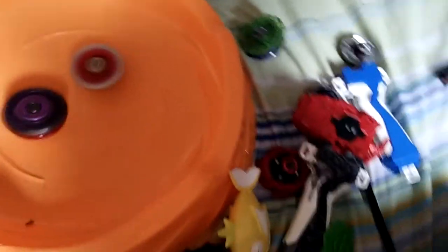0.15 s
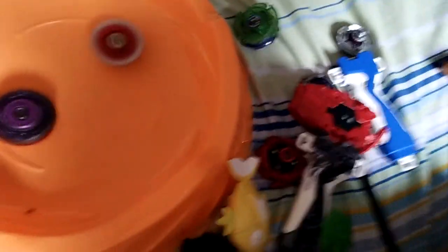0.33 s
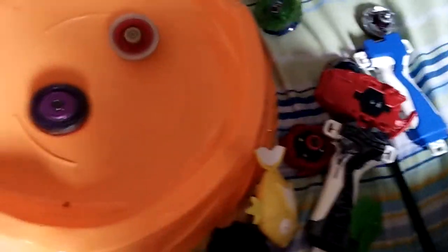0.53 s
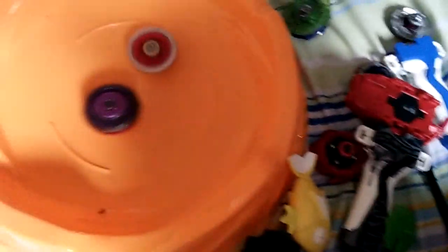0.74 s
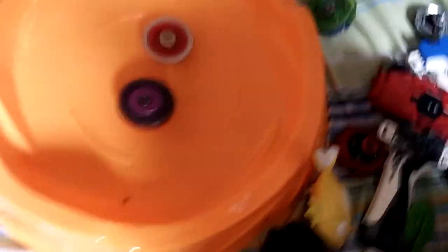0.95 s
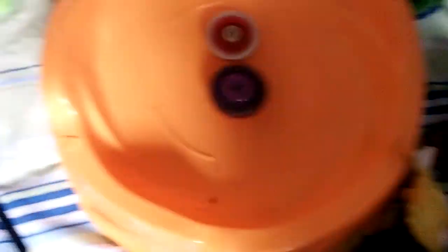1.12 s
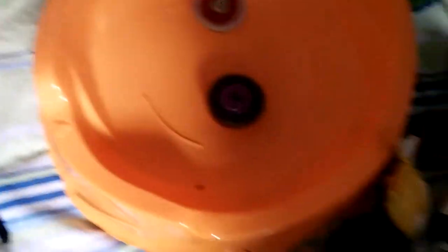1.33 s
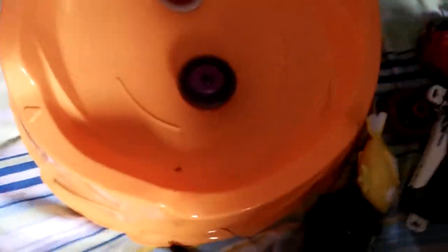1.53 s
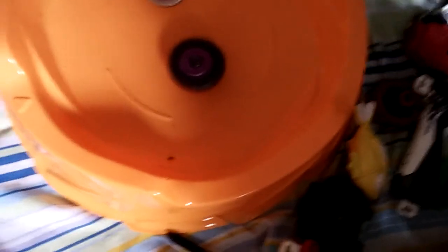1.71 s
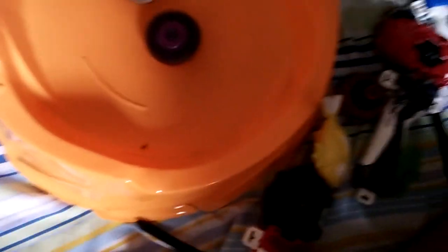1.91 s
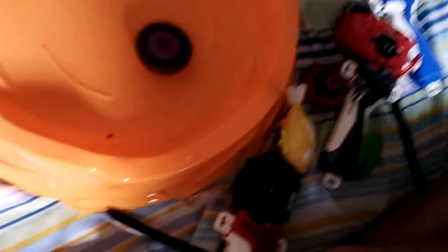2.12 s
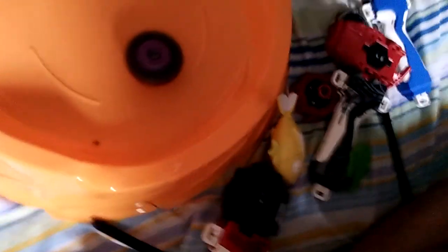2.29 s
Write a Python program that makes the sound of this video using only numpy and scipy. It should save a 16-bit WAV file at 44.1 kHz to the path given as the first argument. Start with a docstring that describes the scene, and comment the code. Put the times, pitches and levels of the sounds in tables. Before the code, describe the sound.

Two plastic toy tops collide four times in a hollow bowl, clacking sharply over faint rolling

```python
"""Toy tops clashing in a bowl

Two toy tops spin in a thin plastic bowl in a small room. Four times they clash: shaped noise makes the crack,
the plastic body and the bright room tail, and fading sine waves make the bowl's thump and the metal discs' ring.
In between, short noise bursts are the rims grazing, and roughened bowl tones are the wobbling tips knocking.
Under it all lies a soft rolling rumble: noise that pulses about once a turn."""
import sys
import numpy as np
from scipy import signal
from scipy.fft import rfft, irfft
from scipy.io import wavfile
from scipy.ndimage import uniform_filter1d

SR = 44100
rng = np.random.default_rng(int(sys.argv[2]) if len(sys.argv) > 2 else 0)


def digitize_waveform(pressure):
    """Quantize a signal to 16-bit integers and store it at the path in sys.argv[1].

    Rows of a 2-D input are taken as channels; values are limited to [-1, 1].
    """
    field = np.atleast_2d(pressure).T
    bounded = np.clip(field, -1, 1)
    quanta = np.round(bounded * 32767).astype(np.int16)
    wavfile.write(sys.argv[1], SR, quanta)


N = 103635
T = np.arange(N) / SR  # time of each sample in seconds

# In the spectra only the shape counts, because noise() evens out the overall level.
# Level of the rolling tips. Each row: time in seconds, level in dB.
ROLL_LEVEL = [(0, -55.5), (.08, -66), (0.137, -52.5), (0.219, -49), (0.508, -68), (.62, -59), (.76, -66),
              (.87, -54.5), (1.123, -76.5), (1.36, -60), (1.451, -72), (1.949, -71), (2.149, -56),
              (2.35, -68.5)]
# Spectrum of the rolling rumble. Each row: frequency in Hz, level in dB per Hz.
ROLL_SPECTRUM = [(30, -11), (45, 4.5), (64, 15), (90, -1), (220, 3.5), (350, -8), (450, 4), (530, -9.5),
                 (620, 2.5), (850, 0), (1420, 2), (1800, -20), (2800, -26), (7000, -33)]
# Spectrum of the faint hiss. Each row: frequency in Hz, level in dB per Hz.
HISS_SPECTRUM = [(1500, 0.5), (4000, -13.5), (14000, -15)]
HISS_DB = -80.5
TURNS_PER_S, SCRAPE_SHARE = 38, 0.55  # the share is the part of the power that pulses
TICK_SCATTER_DB = 3  # how unevenly loud the small contacts are

# Light grazes of the rims. Each row: start in seconds, middle level in dB, treble level in dB.
GRAZES = [(0.0, -61.5, -58.5), (0.166, -74, -54), (0.4732, -60, -52.5), (0.5512, -63, -58.5),
          (0.606, -56, -45.5), (0.6182, -48, -79), (0.6388, -50, -59), (0.667, -56.5, -58.5),
          (0.7283, -54.5, -58.5), (0.759, -50, -64), (0.817, -54.5, -51.5), (2.2056, -70, -52.5),
          (2.2845, -86, -67)]
# Single teeth catching around a clash. Each row: start in seconds, level in dB.
RATTLES = [(0.233, -22), (0.265, -25), (0.279, -23.5), (0.295, -27), (0.321, -28.5), (0.378, -43.5),
           (0.8416, -19), (0.8483, -31), (0.9, -51), (1.158, -29.5), (1.196, -34), (2, -12.5), (2.039, -41),
           (2.094, -58)]
# Spectrum of a graze's middle range. Each row: frequency in Hz, level in dB per Hz.
GRAZE_SPECTRUM = [(1500, -26), (2500, 12), (3300, 7.5), (4500, -8), (7000, -21)]
RATTLE_FALL_S, GRAZE_FALL_S = 0.003, 0.0045
GRAZE_MIDDLE_ROOM_DB, GRAZE_TREBLE_ROOM_DB = -9.5, -3.5

# The clashes. Each row: start in seconds, crack level in dB, burst length in seconds,
# treble centre in Hz (the crack dips here, and the small parts ring most often near it),
# body level in dB, body resonance in Hz, room level in dB, room body level in dB, thump level in dB,
# boom level in dB, high ring level in dB, low ring level in dB.
CLASHES = [(0.2177, -9, .0036, 8850, -22, 850, -22.5, -32.5, -26, -25, -24.5, -54),
           (0.8436, -12, .0014, 8700, -26, 2230, -33, -42, -31, -45, -56, -57),
           (1.1522, -21, .0038, 8400, -26, 620, -31, -38, -31, -43, -62, -42),
           (1.9878, -10, .0026, 8050, -25, 1910, -25, -33, -36, -35, -54, -56)]
# Modes (natural tones) of the bowl's floor, for the thump.
# Each row: frequency in Hz before a small random shift, level in dB, time to fade by 60 dB in seconds.
THUMP_MODES = [(220.3, 2, 0.051), (267.6, -1, 0.069), (409.8, -9.5, 0.12), (583.7, -2, .07)]
# Deeper modes of the floor. Each row: frequency in Hz, level in dB, time to fade by 60 dB in seconds.
BOOM_MODES = [(45, -4, .07), (64, -2, .1), (80, 0, .06), (125, -1, .06)]
THUMP_LEAD_S, THUMP_RISE_S = 0.0079, 0.0063
# Spectrum of the hard tooth contacts. Each row: frequency in Hz, level in dB per Hz.
CRACK_SPECTRUM = [(2500, -18.5), (4000, -19.5), (5700, -12), (7000, -11.5), (8200, 0.5), (9500, -4.5),
                  (11500, -16.5), (13200, -6.5), (14500, -35.5)]
# Spectrum of the plastic body. Each row: frequency in Hz, level in dB per Hz.
BODY_SPECTRUM = [(120, -7.5), (250, -10.5), (370, -20), (520, -14.5), (850, 16), (1400, 14), (2100, 8),
                 (3100, -4), (4500, -13.5), (7000, -34)]
# Spectrum of the bright room tail. Each row: frequency in Hz, level in dB per Hz.
TAIL_SPECTRUM = [(2500, -38.5), (3200, -34.5), (4500, -11), (6000, -1.5), (7000, -2.5), (8300, 7),
                 (9600, 3.5), (11500, -8.5), (13200, -1), (14500, -8.5)]
# Spectrum of the room's answer to the body. Each row: frequency in Hz, level in dB per Hz.
TAIL_BODY_SPECTRUM = [(45, -14), (64, 1), (90, -14), (240, -5), (360, -20.5), (450, -3), (530, -12),
                      (800, -6), (1400, -5), (1900, -13.5), (2900, -9), (4500, -16), (7000, -35)]
CRACK_FALL_S, BODY_FALL_S = 0.0011, 0.005
CRACK_DIP_DB, CRACK_DIP_WIDTH_HZ = -5.5, 180
BODY_RESONANCE_DB, BODY_WIDTH_HZ = 11, 75
ROOM_T60_S, ROOM_BODY_T60_S, ROOM_RISE_S = 0.32, 0.41, 0.0049  # t60: time to fade by 60 dB
CHATTER_PER_S, CHATTER_FALL_S, CHATTER_SHARE = 130, 0.003, 0.35
PARTS_LOW_HZ, PARTS_DB = 5500, -5  # level next to the room level

# High modes of the metal discs. Each row: frequency in Hz, level in dB, time to fade by 60 dB in seconds.
HIGH_RING_MODES = [(8188, -14, .2), (8850, -13, .2), (9523, -3, .33), (9615, 0, .33), (11350, -9, .18),
                   (13020, -8, .19)]
# Lowest mode of each top's disc.
# Each row: frequency in Hz, level in dB, time to fade by 60 dB in seconds, turns per second.
LOW_RING_MODES = [(2985, 0, .8, 39), (3332, 0, 1.0, 37.7)]
LATE_FADE_S, LATE_FADE_SHARE = 0.28, 0.85  # when the ring's level sinks, and what share of it goes
RING_FLUTTER, FLUTTER_S, SPIN_SWING_RAD = 0.3, 0.004, 2.1

# Knocks of a wobbling tip on the bowl.
# Each row: start in seconds, low mode level in dB, middle modes level in dB, high modes level in dB.
KNOCKS = [(0.32, -40, -33.5, -46), (0.375, -47.5, -43.5, -52), (0.47, -49.5, -48, -72),
          (0.544, -45.5, -54, -64.5), (0.603, -51.5, -51.5, -63), (0.617, -44.5, -47, -73),
          (0.644, -52, -50.5, -74), (0.693, -47.5, -55, -68), (0.815, -38, -46.5, -55),
          (0.876, -32, -42, -45.5), (1.007, -48, -59.5, -54.5), (1.037, -42, -60, -73),
          (1.061, -47, -65, -81), (1.087, -40.5, -55, -65), (1.113, -46, -75, -67),
          (1.306, -65.5, -48.5, -57), (1.357, -54.5, -50, -51), (1.407, -67, -54.5, -61),
          (1.487, -68, -52, -64), (1.539, -65, -57, -69), (1.589, -66.5, -58.5, -77),
          (1.671, -77, -56, -81), (1.804, -83, -53.5, -68), (1.83, -59, -54.5, -74),
          (1.855, -71, -56, -70.5), (1.883, -66, -55, -67.5), (1.908, -61, -54.5, -67.5),
          (1.961, -45.5, -55, -66), (2.039, -35.5, -29, -39), (2.057, -29.5, -34.5, -37),
          (2.091, -37.5, -33, -42.5), (2.12, -53.5, -45, -60), (2.143, -60, -45, -60.5),
          (2.203, -46, -46, -67.5), (2.256, -47.5, -65, -76), (2.284, -40, -49.5, -76.5)]
# Low, middle and high modes of the bowl.
# Each row: frequency in Hz before a small random shift, level in dB, time to fade by 60 dB in seconds.
BOWL_LOW = [(780, -14.5, 0.0074), (849, -7.5, 0.046), (930, -17, 0.071)]
BOWL_MIDDLE = [(1018, 12.5, 0.016), (1185, 5, 0.047), (1282, 4, 0.079), (1436, 14.5, 0.039),
               (1465, -11, 0.11)]
BOWL_HIGH = [(2220, -8, 0.02), (2672, 1, 0.041)]
CONTACT_S, LOW_SWELL = 0.008, 1.6  # length of a push, gain of the low modes
SCUFF_DB, SCUFF_FALL_S, KNOCK_ROOM_DB = -14, 0.008, -12

WIDTH_DB = -14.5
TOP_HZ = 14350


def undb(db):
    """Turn decibels into a gain."""
    return 10 ** (np.asarray(db) / 20)


def noise(points, centre_hz=1000, change_db=0, width_hz=CRACK_DIP_WIDTH_HZ):
    """Unit-level noise with a given spectrum and an optional peak or dip."""
    f = np.arange(N // 2 + 1) * SR / N + 1e-3
    p = np.array(points)
    db = np.interp(np.log(f), np.log(p[:, 0]), p[:, 1])
    db += change_db / (1 + ((f - centre_hz) / width_hz) ** 2)
    # fade out below the first point and above the last
    ends = np.minimum(f / p[0, 0], 1) ** 2 * np.minimum(p[-1, 0] / f, 1) ** 2
    y = irfft(rfft(rng.standard_normal(N)) * undb(db) * ends, N)
    return y / y.std()


def burst(start, fall, hold=0, rise=0.0002):
    """Loudness curve that rises quickly, then falls exponentially once the hold time has passed."""
    u = T - start
    return np.clip(u / rise, 0, 1) * np.exp(-np.maximum(u - hold, 0) / fall)


def ring(modes, start, scatter=0):
    """Fading sine waves struck at one moment, scaled to a unit starting level together."""
    u, out = np.maximum(T - start, 0), np.zeros(N)
    on = (u > 0) & (u < max(m[2] for m in modes) * 2)
    for hz, db, t60 in modes:
        shifted_hz = hz * (1 + scatter * rng.standard_normal())
        cycles = shifted_hz * u[on] + rng.random()
        out[on] += undb(db) * np.sin(2 * np.pi * cycles) * np.exp(-np.log(1000) * u[on] / t60)
    return out / np.sqrt(sum(undb(m[1]) ** 2 for m in modes) / 2)


def room(x, db):
    """A sound plus its echoes, blurred together by a fading stretch of noise."""
    tail = rng.standard_normal(N) * burst(0.011, ROOM_T60_S / np.log(1000))
    return x + undb(db) * signal.fftconvolve(x, tail / np.linalg.norm(tail))[:N]


def ticks(rate, jitter, fall, share):
    """Loudness curve of unit power: a smooth part plus a train of small contacts of uneven size."""
    chance = rng.standard_normal((int(2 * rate * N / SR), 2))
    times = np.append(0, np.cumsum(np.exp(jitter * chance[:, 0]) / rate))
    last = np.searchsorted(times, T, side="right") - 1  # latest contact at each moment
    size = undb(TICK_SCATTER_DB * chance[last, 1])
    power = (size * np.exp((times[last] - T) / fall)) ** 2
    return np.sqrt(1 - share + share * power / power.mean())


def wander(seconds):
    """Smooth unit-level random motion: noise averaged twice over a short time."""
    k = max(int(seconds * SR), 2)
    y = uniform_filter1d(uniform_filter1d(rng.standard_normal(N), k), k)
    return y / y.std()


def rolling():
    """The tips rumble on the bowl, scraping harder about once a turn, over a faint steady hiss."""
    s, db = np.array(ROLL_LEVEL).T
    level = undb(np.interp(T, s, db))
    scrape = ticks(TURNS_PER_S, 0.12, SCUFF_FALL_S, SCRAPE_SHARE)
    return noise(ROLL_SPECTRUM) * level * scrape + undb(HISS_DB) * noise(HISS_SPECTRUM)


def grazes():
    """Rims rattle around a clash and brush each other in passing, as short bursts of noise."""
    rattle = noise(TAIL_SPECTRUM) * sum(undb(db) * burst(s, RATTLE_FALL_S) for s, db in RATTLES)
    middle = noise(GRAZE_SPECTRUM) * sum(undb(db) * burst(s, GRAZE_FALL_S) for s, db, _ in GRAZES)
    treble = noise(CRACK_SPECTRUM) * sum(undb(db) * burst(s, GRAZE_FALL_S) for s, _, db in GRAZES)
    return rattle + room(middle, GRAZE_MIDDLE_ROOM_DB) + room(treble, GRAZE_TREBLE_ROOM_DB)


def thumps():
    """Each clash jolts the bowl's floor into fading deep tones, heard just ahead of the crack."""
    out = np.zeros(N)
    for s, *_, thump_db, boom_db, _, _ in CLASHES:
        start = s - THUMP_LEAD_S
        swing = undb(thump_db) * ring(THUMP_MODES, start, scatter=0.025)
        swing += undb(boom_db) * ring(BOOM_MODES, start)
        out += swing * np.clip((T - start) / THUMP_RISE_S, 0, 1)
    return out


def clashes():
    """Hard bursts of contacts, the plastic body under them and the room's fading answer."""
    out = np.zeros(N)
    for s, db, length, treble_hz, body_db, body_hz, room_db, room_body_db, *_ in CLASHES:
        crack = noise(CRACK_SPECTRUM, treble_hz, CRACK_DIP_DB) * burst(s, CRACK_FALL_S, length)
        body = noise(BODY_SPECTRUM, body_hz, BODY_RESONANCE_DB, BODY_WIDTH_HZ) * burst(s, BODY_FALL_S)
        out += undb(db) * crack + undb(body_db) * body

        tail = noise(TAIL_SPECTRUM) * burst(s, ROOM_T60_S / np.log(1000), rise=ROOM_RISE_S)
        chatter = ticks(CHATTER_PER_S, 0.78, CHATTER_FALL_S, CHATTER_SHARE)
        out += undb(room_db) * tail * chatter

        # small parts of the tops ring, most often near the treble centre
        parts_hz = rng.triangular(PARTS_LOW_HZ, treble_hz, TOP_HZ, size=18)
        parts = [(f, 0, ROOM_T60_S) for f in parts_hz]
        out += undb(room_db + PARTS_DB) * ring(parts, s)

        tail_body = noise(TAIL_BODY_SPECTRUM, body_hz, BODY_RESONANCE_DB / 2, BODY_WIDTH_HZ)
        tail_body *= burst(s, ROOM_BODY_T60_S / np.log(1000), rise=ROOM_RISE_S)
        out += undb(room_body_db) * tail_body
    return out


def discs():
    """The metal discs ring after a clash; spin swings the low pitch once a turn, and the level sinks late."""
    out = np.zeros(N)
    for s, *_, high_db, low_db in CLASHES:
        age = np.maximum(T - s, 1 / SR)
        # the ring's level sinks about 0.28 s after the clash
        late_fade = 1 - LATE_FADE_SHARE / (1 + (LATE_FADE_S / age) ** 10)
        out += undb(high_db) * ring(HIGH_RING_MODES, s) * late_fade
        for hz, db, t60, turns in LOW_RING_MODES:
            swing = SPIN_SWING_RAD * np.sin(2 * np.pi * (turns * T + rng.random()))
            tone = np.sin(2 * np.pi * hz * T + swing) * (1 + RING_FLUTTER * wander(FLUTTER_S))
            fading = undb(low_db + db) * tone * burst(s, t60 / np.log(1000)) * late_fade
            out += room(fading, db=-8.5)
    return out


def knocks():
    """A wobbling tip scuffs the bowl; each rough push favours other modes."""
    out = np.zeros(N)
    push = np.hanning(int(CONTACT_S * SR))
    for s, low, middle, high in KNOCKS:
        # the lowest modes swell smoothly
        swell = LOW_SWELL * np.clip((T - s) / CONTACT_S, 0, 1)
        out += undb(low) * ring(BOWL_LOW, s, scatter=0.012) * swell
        at = slice(int(s * SR), int(s * SR) + SR // 10)  # a tenth of a second
        for modes, db in (BOWL_MIDDLE, middle), (BOWL_HIGH, high):
            clean = ring(modes, s, scatter=0.02)[at]
            rough_push = push * rng.standard_normal(len(push))
            rough = signal.fftconvolve(clean, rough_push)[:len(clean)]
            out[at] += undb(db) * rough * clean.std() / rough.std()  # as strong as the clean ring
    scuffs = sum(undb(middle + SCUFF_DB) * burst(s, SCUFF_FALL_S, CONTACT_S / 2, CONTACT_S / 2)
                 for s, _, middle, _ in KNOCKS)
    return room(out + scuffs * noise(BODY_SPECTRUM), KNOCK_ROOM_DB)


def scene():
    """Everything is central; noise that follows the treble's loudness adds a little width."""
    mid = rolling() + grazes() + thumps() + clashes() + discs() + knocks()
    treble = signal.sosfilt(signal.butter(4, 5500, "high", fs=SR, output="sos"), mid)
    loudness = uniform_filter1d(np.abs(treble), size=44)  # averaged over about 1 ms
    side = undb(WIDTH_DB) * loudness * noise(TAIL_SPECTRUM)
    return np.array([mid + side, mid - side])


def record(dry):
    """The microphone drops the deepest bass and rounds the highest peaks; the top is cut."""
    no_deep_bass = signal.sosfilt(signal.butter(3, 42, "high", fs=SR, output="sos"), dry)
    heard = np.tanh(no_deep_bass)
    return signal.sosfilt(signal.ellip(10, 0.2, 70, TOP_HZ, fs=SR, output="sos"), heard)


dry = scene()
out = record(dry)
digitize_waveform(out)
```